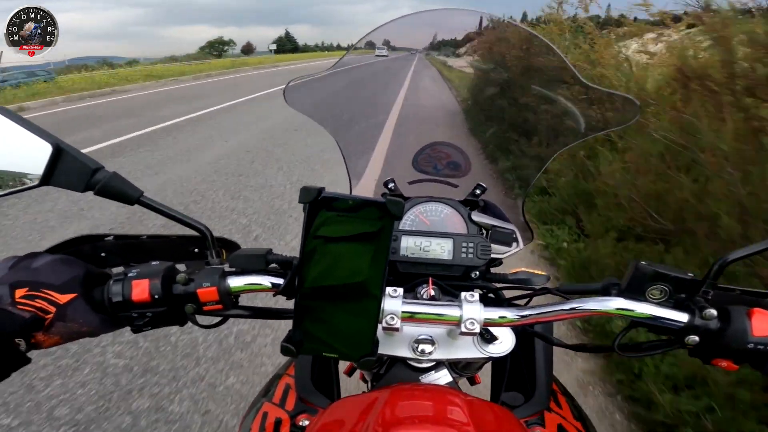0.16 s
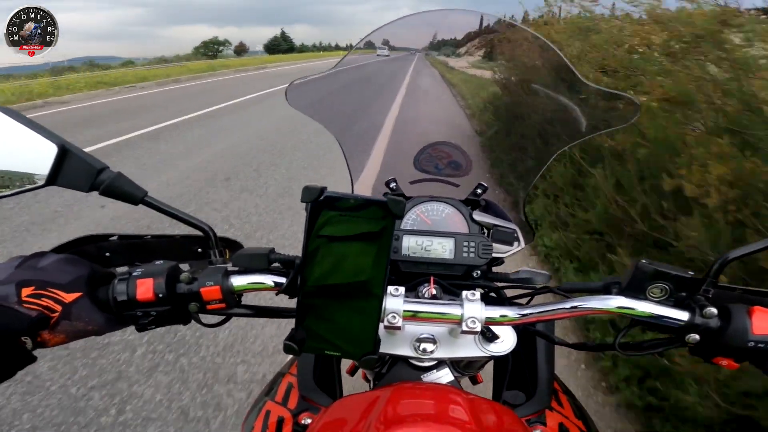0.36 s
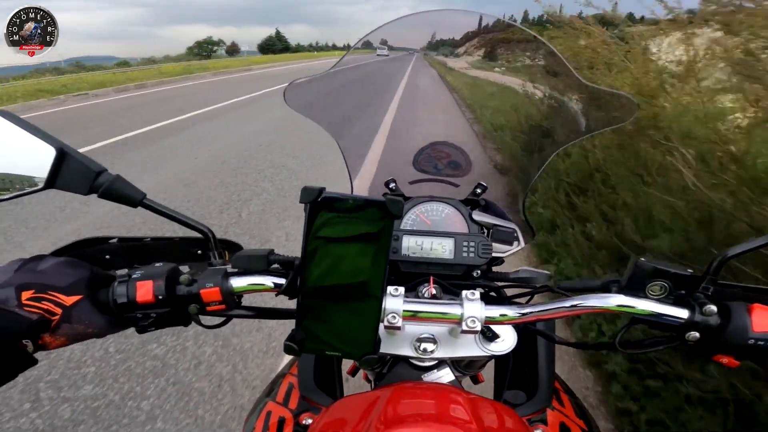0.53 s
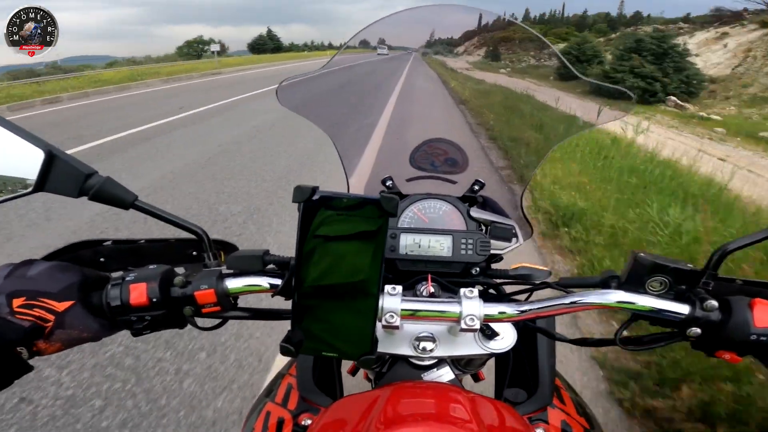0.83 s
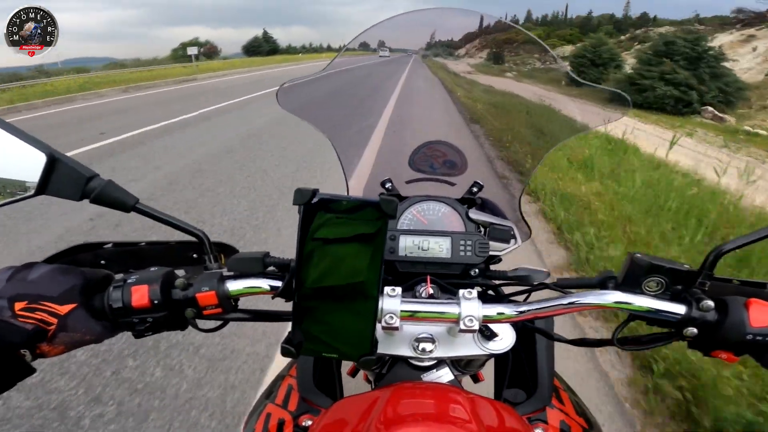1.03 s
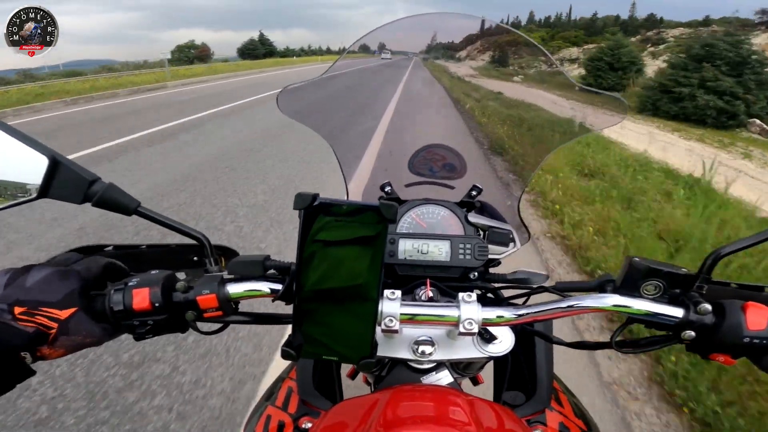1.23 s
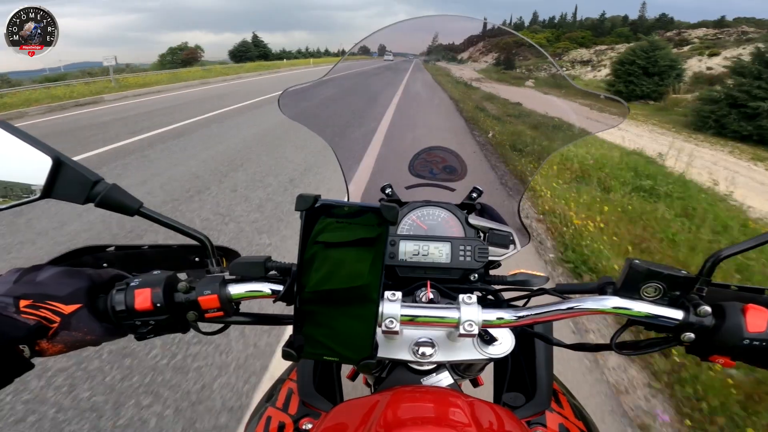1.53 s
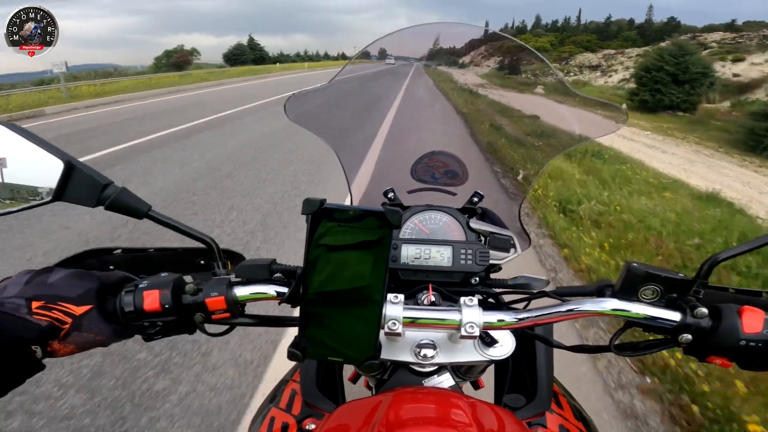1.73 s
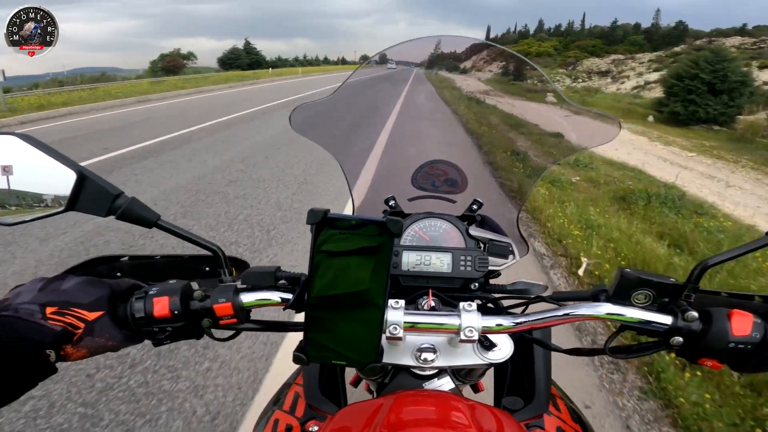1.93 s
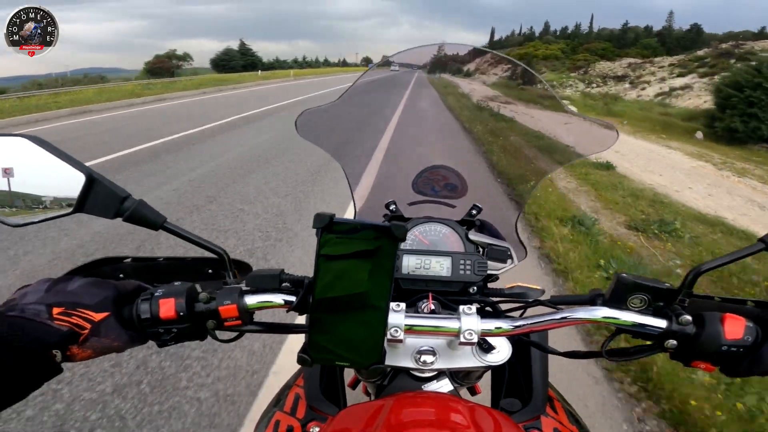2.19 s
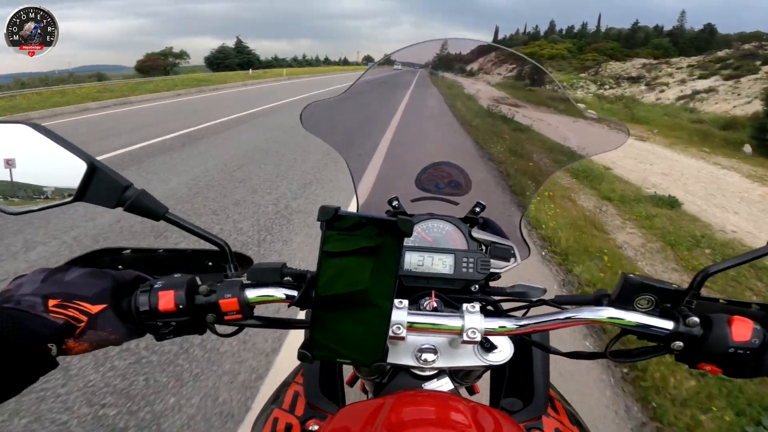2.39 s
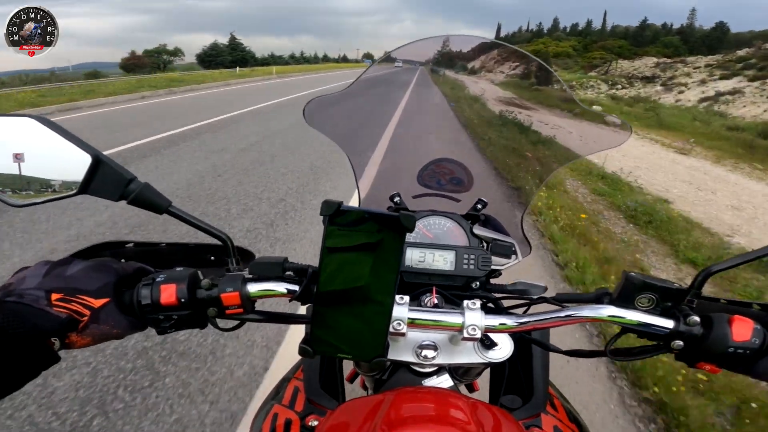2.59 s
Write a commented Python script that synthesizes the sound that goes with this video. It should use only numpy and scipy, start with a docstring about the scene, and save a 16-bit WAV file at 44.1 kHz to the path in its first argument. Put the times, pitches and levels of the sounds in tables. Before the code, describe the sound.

Motorcycle single chugging from the rider's seat, dying mid-ride, ticking over unfired, then refiring amid tyre roar

```python
"""On a road, from the rider's seat of a single-cylinder motorcycle that slowly loses speed.
Close by, each engine cycle gives an exhaust thump, an intake honk (pulses that ring ducts) and valve ticks
(short noise bursts). The engine cuts out, is turned over by the wheel, coughs and catches again.
Around it are coloured noises: tyre roar, frame rumble, gear hiss and wind buffeting the microphone;
a faint wavering hum and light knocks come from the bodywork."""
import sys
import numpy as np
from scipy import signal
from scipy.fft import rfft
from scipy.io import wavfile
from scipy.ndimage import uniform_filter1d

SR = 44100
rng = np.random.default_rng(int(sys.argv[2]) if len(sys.argv) > 2 else 0)


def put_to_file(sound):
    """Save the sound as 16-bit audio at rate SR, in the file named by the first command-line argument."""
    columns = np.atleast_2d(sound).T  # one column per channel
    safe = np.clip(columns, -1, 1)
    whole_steps = np.round(safe * 32767)
    wavfile.write(sys.argv[1], SR, whole_steps.astype(np.int16))


N = 121275
TIME = np.arange(N) / SR

# All spectra give relative level per Hz.
# tyres and rushing air: (frequency [Hz], level [dB])
ROAD_COLOUR = [(150, -8.5), (380, 2), (500, 0), (630, -4.5), (780, -1.5), (900, 0.5), (1200, -9),
               (1500, -5.5), (1900, -9), (2250, -23), (3500, -35), (8000, -55)]
# strength of the road sound: (time [s], level [dB])
ROAD_LEVEL = [(0, -1), (.8, 1), (1.6, .5), (2.2, -1), (2.72, 0.5)]
# road rumble through the frame: (frequency [Hz], level [dB])
RUMBLE_COLOUR = [(20, -2), (60, -5.5), (110, 2.5), (160, -4), (215, -2), (300, -9), (380, -12.5),
                 (500, -21.5), (1000, -66)]
# wind on the microphone: (frequency [Hz], level [dB])
WIND_COLOUR = [(2, -41.5), (5, 8.5), (9, 1), (20, -0.5), (40, -3), (65, -7), (100, -28.5), (200, -29),
               (400, -68.5), (2000, -100)]
# gusts: (time [s], level [dB])
GUSTS = [(0, 3.5), (.3, -2.5), (.5, -0.5), (.58, 5.5), (.72, -3.5), (.85, -1), (1.2, -2), (1.65, -2.5),
         (1.85, -1), (2.02, 5.5), (2.12, -1.5), (2.28, 4), (2.45, 3), (2.6, 2.5), (2.75, -1)]
# faint hum of the bodywork: (time [s], level [dB])
HUM_LEVEL = [(0, -54), (.2, -46), (.6, -55), (1.6, -52.5), (1.85, -42.5), (2.05, -49.5), (2.2, -61),
             (2.5, -42), (2.75, -49.5)]
# light knocks of the bodywork: (time [s], level [dB])
KNOCKS = [(1.453, -34), (1.881, -40), (2.624, -38)]
# spectrum of a knock: (frequency [Hz], level [dB])
KNOCK_COLOUR = [(200, -20), (400, 8), (900, 5), (1700, -6), (2500, -31), (8000, -53)]
# hiss of chain and gears: (frequency [Hz], level [dB])
WHIR_COLOUR = [(1500, -39), (2300, -1), (3000, 0.5), (3800, 1.5), (4500, -1), (5050, 2), (5350, -8),
               (5750, 0.5), (6300, -6.5), (7400, 0), (8600, -13), (11000, -7), (14000, -14), (15700, -19.5)]
# strength of the hiss and the casing: (time [s], level [dB])
WHIR_LEVEL = [(0, -2), (.5, 1.5), (1.4, 0.5), (1.68, 2), (1.9, -.5), (2.2, -1), (2.42, -1.5), (2.72, 1.5)]
# resonances of the engine casing: (frequency [Hz], width [Hz], level [dB])
CASING = [(2480, 190, -3.5), (3770, 50, -3.5), (5045, 90, -4.5), (5564, 90, -1), (5860, 46, -1.5),
          (6980, 660, -9)]
# spectrum of the valve ticks: (frequency [Hz], level [dB])
TICK_COLOUR = [(2000, -31), (4000, -12), (7500, -1.5), (8800, -10), (9700, -2), (12500, -2.5), (14200, -10),
               (15000, -8.5), (15700, -23.5)]
# strength of the valve ticks: (time [s], level [dB])
TICK_LEVEL = [(0, -14), (.5, -8), (.9, -5), (1.55, -5.5), (2.0, -8), (2.2, -2), (2.27, -7), (2.42, -1.5),
              (2.52, -1.5), (2.65, -3.5), (2.72, -2)]
# pulses of the cough while the engine is dead: (time [s], level [dB])
COUGHS = [(1.98, -8.5), (1.994, -3)]
# ring of a cough: (frequency [Hz], level [dB], t60 [s])
COUGH_RING = [(44.7, -18, 0.083), (129, -12, 0.01), (224, -10.5, 0.06)]
# ring of the airbox: (frequency [Hz], level [dB], t60 [s])
AIRBOX = [(314.2, -13, 0.11), (278.7, -28.5, .045), (62.7, -29, 0.35), (198, -34, 0.16)]
# strength of the intake honk: (time [s], level [dB])
THROTTLE = [(0, 1), (.3, 2.5), (1.0, 4.5), (1.62, 1.5), (1.672, .5), (1.695, -8), (1.718, -1), (1.745, -28),
            (2.70, -27), (2.72, 2.5)]
# thump of the exhaust: (frequency [Hz], level [dB], t60 [s])
EXHAUST = [(84, -18, 0.14), (160, -15.5, .015)]
# strength of the exhaust thump: (time [s], level [dB])
LOAD = [(0, 3), (.4, 3), (1.6, -1.5), (1.75, -2.5), (1.85, 2.5), (2.1, -12), (2.2, -1), (2.36, -3),
        (2.55, -22), (2.72, -5)]
# ring of the exhaust pipe: (frequency [Hz], level [dB], t60 [s])
PIPE = [(231.4, -16, 0.067), (167, -24.5, 0.051)]
# strength of the pipe ring: (time [s], level [dB])
PIPE_LEVEL = [(0, -9), (0.399, 0.5), (1.65, 4), (1.75, -2.5), (1.85, -9), (2.1, -13.5), (2.35, -11),
              (2.55, -20), (2.72, -4.5)]

# noise levels before their time curves; patchiness is the rms drift
ROAD_DB, ROAD_PATCHY_DB, RUMBLE_DB = -42.5, .8, -31
WIND_DB, WIND_PATCHY_DB = -23, .5
# mean pitch, rms pitch waver as a share, rms flicker of the level
HUM_HZ, HUM_WAVER, HUM_FLICKER_DB = 432, .0065, 2.5
KNOCK_DECAY_S = .006
# depth of the swell, and the share of a cycle at which it peaks
WHIR_DB, CASING_DB, WHIR_PULSING, WHIR_AT = -59.5, -68.5, .17, .34
# cycle rate at time zero, and its steady fall in cycles/s per second
FIRST_S, CYCLES_PER_S, SLOWING_PER_S2 = .0096, 22.92, 1.395
# places in the engine cycle, as shares of a cycle
INTAKE_AT, EXHAUST_AT, TICK_AT, CLOSE_AT = -.019, .678, -.055, .70
TICK_DB, CLOSE_DB, TICK_UNEVEN_DB = -53.5, -9, 1.3
TICK_RISE_S, TICK_DECAY_S, TICK_TAIL_DB, TICK_TAIL_S = .0009, .003, -1, .010
# the honk starts flat by this share of its pitch, then settles
FLAT_START, SETTLE_S, RISE_S = .25, .0033, .001
# spread from pulse to pulse of level, timing and pitch (a share)
UNEVEN_DB, JITTER_S, DETUNE = .7, .00012, .005
MUFFLE_HZ, EDGE_HZ = 422, 15700


def amp(db):
    """Decibels to gain."""
    return 10 ** (np.asarray(db) / 20)


def unit(x):
    """Scales to rms 1."""
    return x / np.sqrt(np.mean(x ** 2) + 1e-20)


def level(points):
    """Gain over time of a (time [s], level [dB]) curve."""
    return amp(np.interp(TIME, *np.transpose(points)))


def colour(points, hz):
    """Gain of a (frequency [Hz], level [dB]) spectrum, drawn on a log frequency axis."""
    f, db = np.transpose(points)
    return amp(np.interp(np.log(hz + 1), np.log(f), db))


def add(mix, s, sound):
    """Mixes a sound in at time s, trimmed to the ends of the mix."""
    start = round(s * SR)
    sound = sound[max(-start, 0):]
    part = mix[max(start, 0):][:len(sound)]
    part += sound[:len(part)]


def noise(spectrum, patchy_db=0):
    """Coloured noise of rms 1 whose level drifts in small patches of time and frequency."""
    z = signal.stft(rng.standard_normal(N), nperseg=512)[2]
    patches = uniform_filter1d(rng.standard_normal(z.shape), size=5, axis=0)
    patches = unit(uniform_filter1d(patches, size=5, axis=1))
    patchy = signal.istft(z * amp(patchy_db * patches), nperseg=512)[1][:N]
    gain = colour(spectrum, np.fft.rfftfreq(N, 1 / SR))
    return unit(np.fft.irfft(rfft(patchy) * gain, N))


def cycles(s):
    """Engine cycles completed at time s, as the bike slows evenly."""
    return CYCLES_PER_S * (s - FIRST_S) - SLOWING_PER_S2 * s ** 2 / 2


def moments(place):
    """The times at which the engine passes one place in its cycle."""
    s = np.linspace(-.1, N / SR + .1, 3000)
    return np.interp(np.arange(-1, cycles(N / SR)) + place, cycles(s), s)


def wind():
    """Lumpy low noise of wind buffeting the microphone, rising and falling in gusts."""
    return amp(WIND_DB) * level(GUSTS) * noise(WIND_COLOUR, WIND_PATCHY_DB)


def road():
    """Tyre roar and rushing air, with road rumble carried through the frame."""
    roar = amp(ROAD_DB) * noise(ROAD_COLOUR, ROAD_PATCHY_DB)
    rumble = amp(RUMBLE_DB) * noise(RUMBLE_COLOUR, patchy_db=2.5)
    return level(ROAD_LEVEL) * (roar + rumble)


def hum():
    """A faint bodywork tone; slow noises make its pitch waver and its level flicker."""
    slow = [(10, 0), (30, -10), (100, -60), (300, -100)]
    waver, flicker = noise(slow), noise(slow)
    pitch = HUM_HZ * (1 + HUM_WAVER * waver)
    tone = np.sqrt(2) * np.sin(2 * np.pi * np.cumsum(pitch) / SR)
    return level(HUM_LEVEL) * amp(HUM_FLICKER_DB * flicker) * tone


def knocks():
    """Loose bodywork knocks lightly on bumps: noise bursts that die away at once."""
    t, envelope = np.arange(SR // 20) / SR, np.zeros(N)
    for s, db in KNOCKS:
        add(envelope, s, amp(db) * np.exp(-t / KNOCK_DECAY_S))
    return envelope * noise(KNOCK_COLOUR)


def whir():
    """Hiss of chain and gears that swells once per cycle, with a faint ring of the casing."""
    swell = 1 + WHIR_PULSING * np.cos(2 * np.pi * (cycles(TIME) - WHIR_AT))
    casing = np.zeros(N)
    for hz, width, db in CASING:
        resonator = signal.iirpeak(hz, hz / width, SR)
        casing += amp(db) * unit(signal.lfilter(*resonator, rng.standard_normal(N)))
    hiss = amp(WHIR_DB) * noise(WHIR_COLOUR, patchy_db=2.5)
    return level(WHIR_LEVEL) * swell * (hiss + amp(CASING_DB) * casing)


def valves():
    """A strong tick and a weaker one in every cycle: noise bursts with a short metallic tail."""
    t, envelope = np.arange(SR // 20) / SR, np.zeros(N)
    tail = amp(TICK_TAIL_DB) * np.exp(-t / TICK_TAIL_S)
    tick = (1 - np.exp(-t / TICK_RISE_S)) * (np.exp(-t / TICK_DECAY_S) + tail)
    for place, db in ((TICK_AT, 0), (CLOSE_AT, CLOSE_DB)):
        for s in moments(place):
            add(envelope, s, amp(db + TICK_UNEVEN_DB * rng.standard_normal()) * tick)
    return amp(TICK_DB) * level(TICK_LEVEL) * envelope * noise(TICK_COLOUR)


def ring(modes, stretch=1, flat=0):
    """A pressure pulse rings a cavity; it can start flat while its valve is still open."""
    t = np.arange(SR // 4) / SR
    # running slow at first lowers the pitch
    warped = stretch * (t - flat * SETTLE_S * (1 - np.exp(-t / SETTLE_S)))
    waves = np.zeros(len(t))
    for hz, db, t60 in modes:
        waves += amp(db - 60 * t / t60) * np.sin(2 * np.pi * hz * warped)
    return -waves * (1 - np.exp(-t / RISE_S))


def coughs():
    """Weak, stray firing in the dead engine: gas pulses that ring and die."""
    out = np.zeros(N)
    for s, db in COUGHS:
        add(out, s, amp(db) * ring(COUGH_RING))
    return out


def pulses(place, modes, strength, flat=0):
    """One gas pulse per cycle, each a little different, muffled by the ducts."""
    out = np.zeros(N)
    for s in moments(place):
        size, late, sharp = rng.standard_normal(3)
        pulse = amp(UNEVEN_DB * size) * ring(modes, 1 + DETUNE * sharp, flat)
        add(out, s + JITTER_S * late, pulse)
    muffle = signal.butter(5, MUFFLE_HZ, fs=SR, output="sos")
    return signal.sosfiltfilt(muffle, level(strength) * out)


def intake():
    """The honk of the airbox, rung by one pulse per cycle and rising from a flat start."""
    return pulses(INTAKE_AT, AIRBOX, THROTTLE, FLAT_START)


def exhaust():
    """The exhaust thump and the ring of its pipe, set off by one gas pulse per cycle."""
    return pulses(EXHAUST_AT, EXHAUST, LOAD) + pulses(EXHAUST_AT, PIPE, PIPE_LEVEL)


def scene():
    """Wind, road, bodywork and engine at one microphone."""
    background = wind() + road() + hum() + knocks()
    engine = whir() + valves() + coughs() + intake() + exhaust()
    return (background + engine)[None]


def record(dry):
    """The recorder's band limit: a steep low-pass."""
    low_pass = signal.firwin(511, EDGE_HZ, window=("kaiser", 9), fs=SR)
    return signal.oaconvolve(dry, low_pass[None], "same")


dry = scene()
out = record(dry)
put_to_file(out)
```